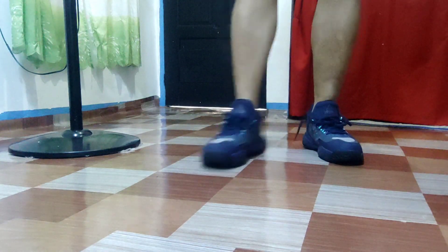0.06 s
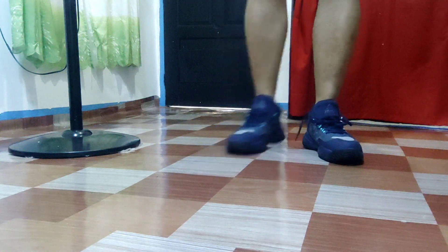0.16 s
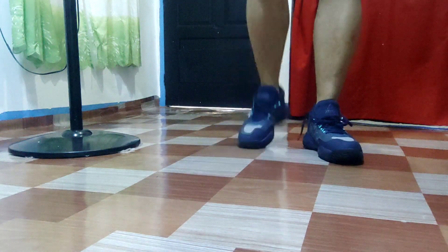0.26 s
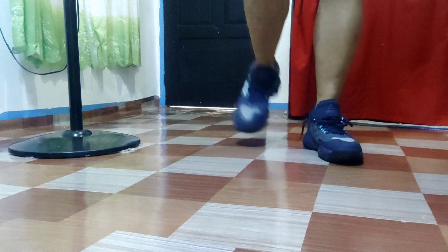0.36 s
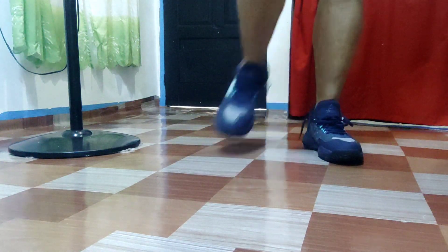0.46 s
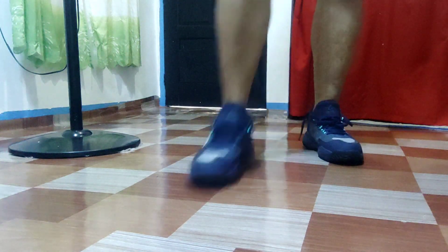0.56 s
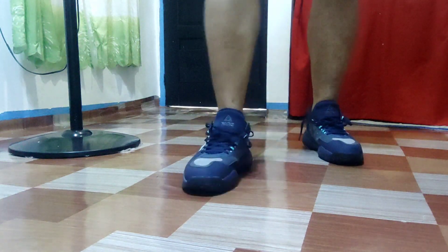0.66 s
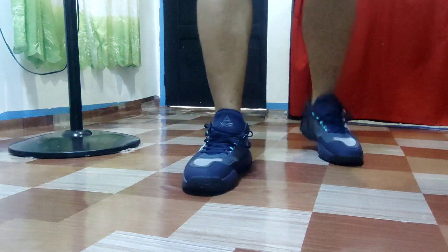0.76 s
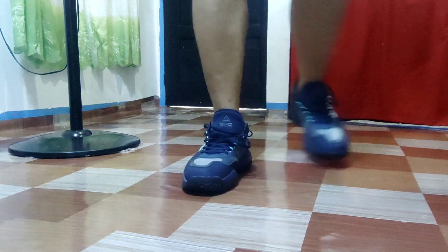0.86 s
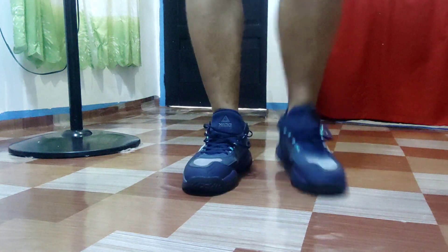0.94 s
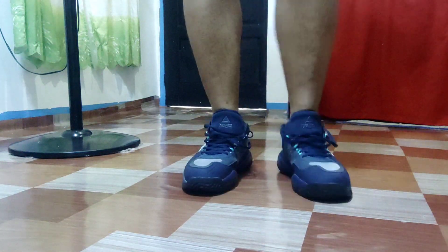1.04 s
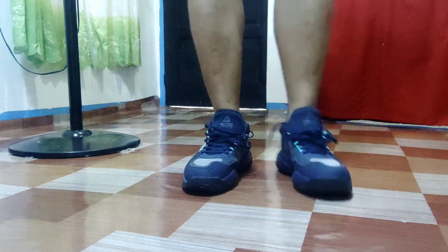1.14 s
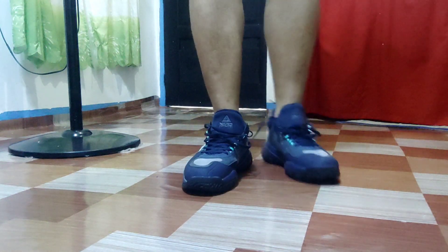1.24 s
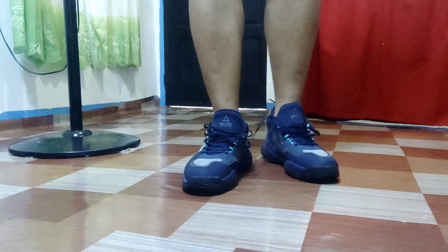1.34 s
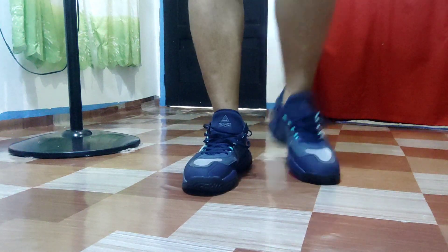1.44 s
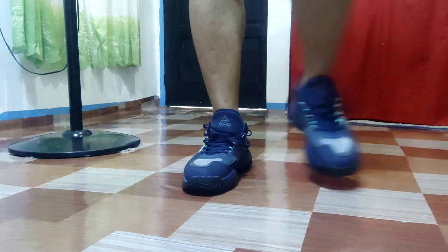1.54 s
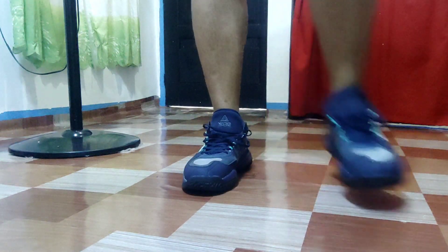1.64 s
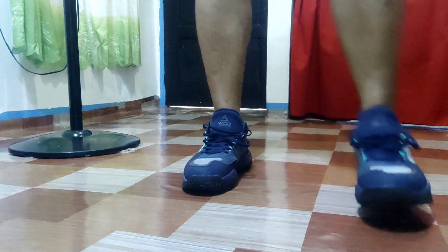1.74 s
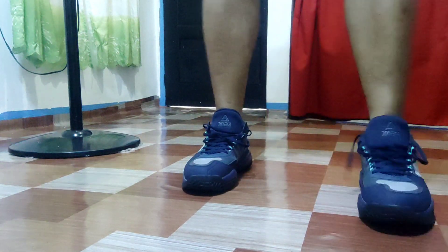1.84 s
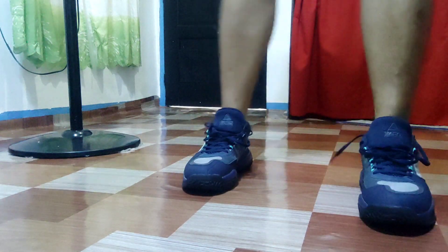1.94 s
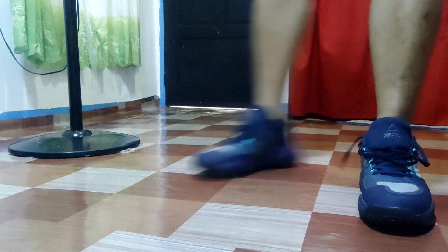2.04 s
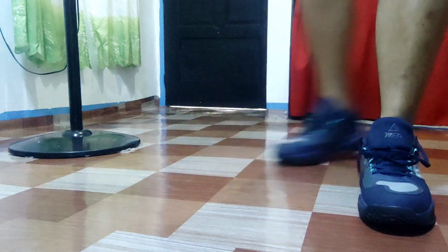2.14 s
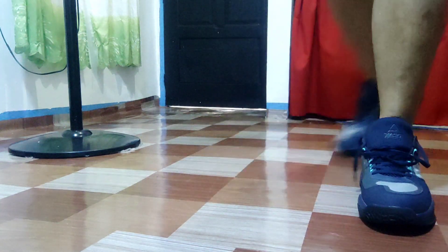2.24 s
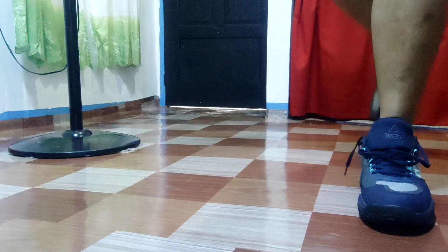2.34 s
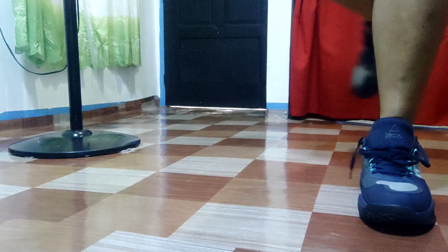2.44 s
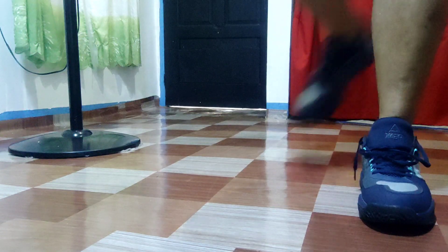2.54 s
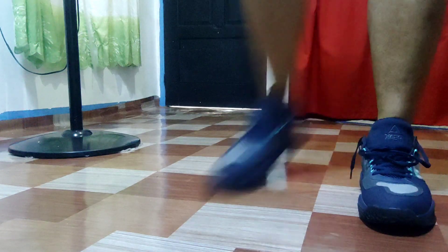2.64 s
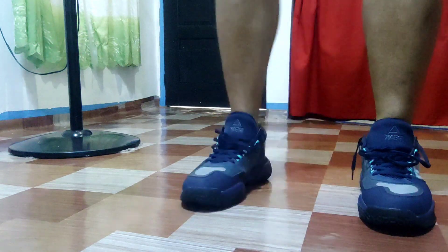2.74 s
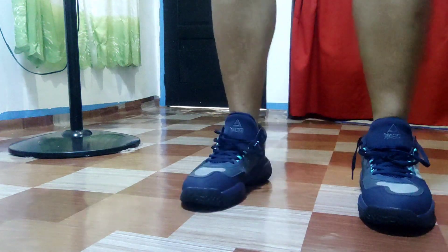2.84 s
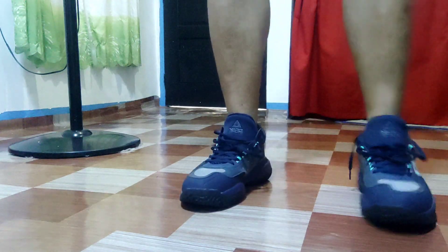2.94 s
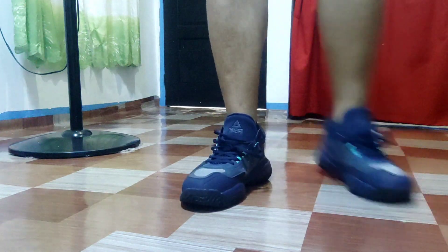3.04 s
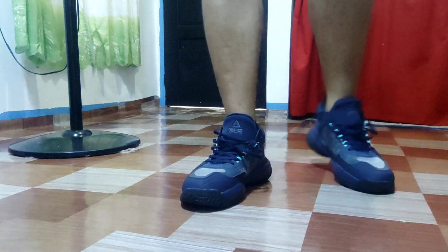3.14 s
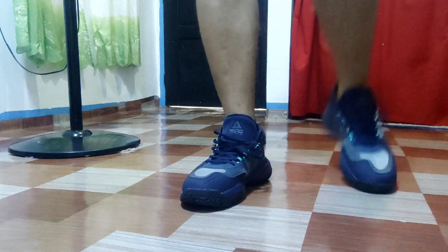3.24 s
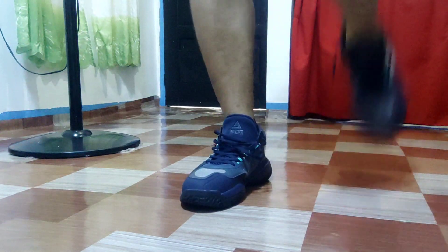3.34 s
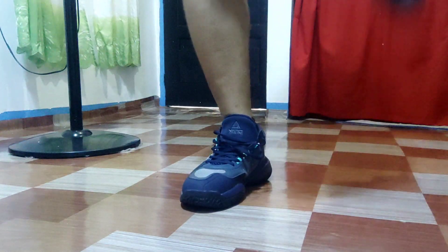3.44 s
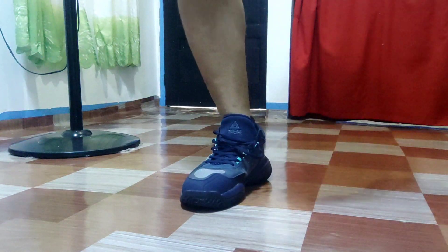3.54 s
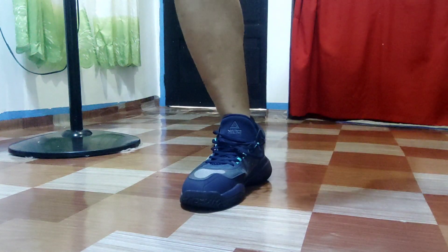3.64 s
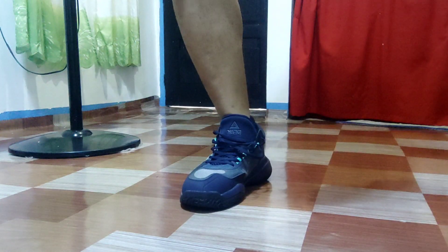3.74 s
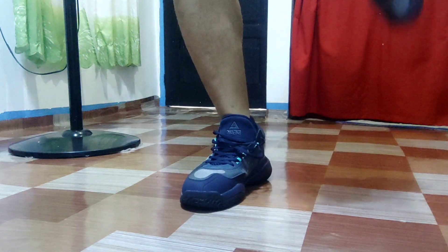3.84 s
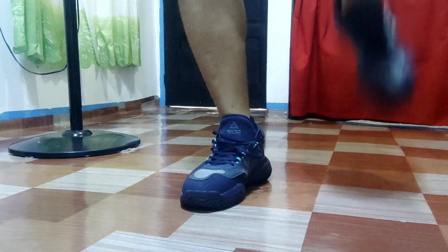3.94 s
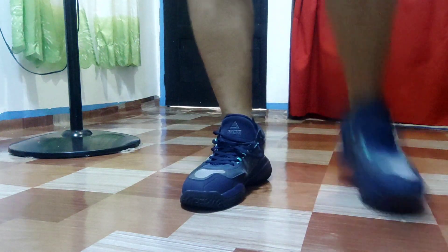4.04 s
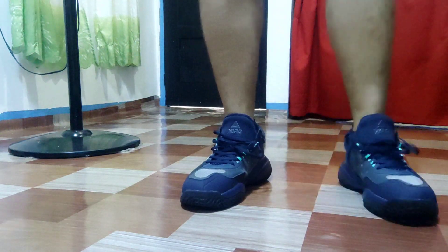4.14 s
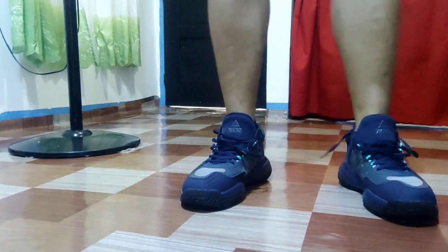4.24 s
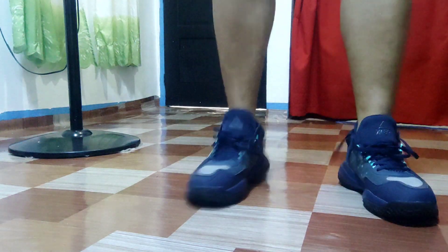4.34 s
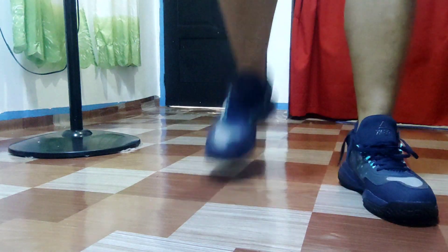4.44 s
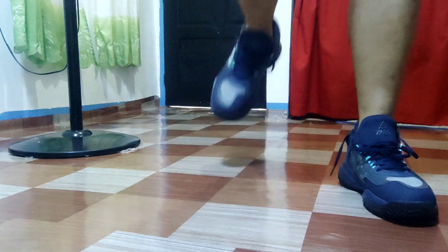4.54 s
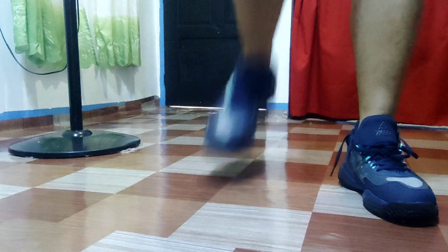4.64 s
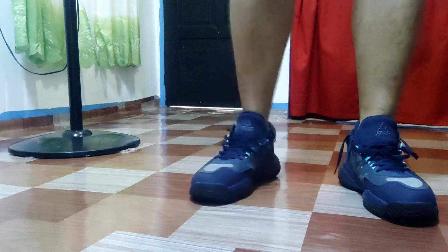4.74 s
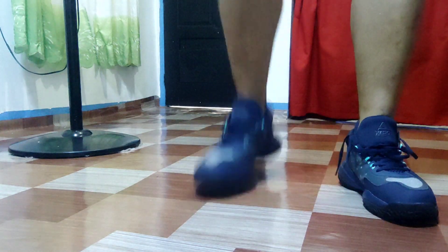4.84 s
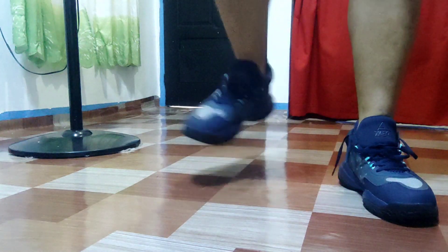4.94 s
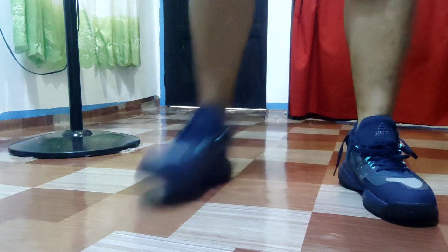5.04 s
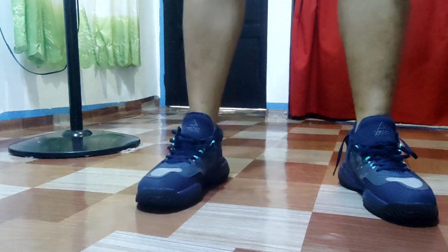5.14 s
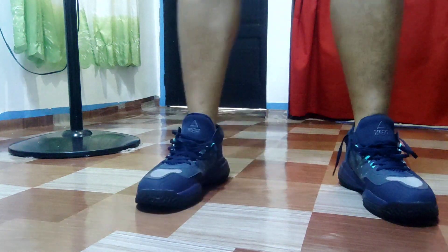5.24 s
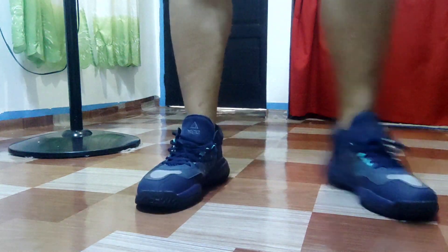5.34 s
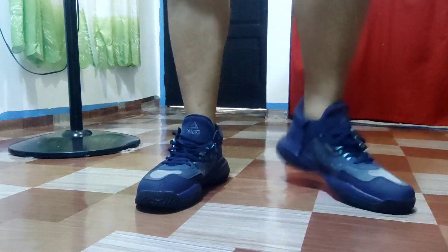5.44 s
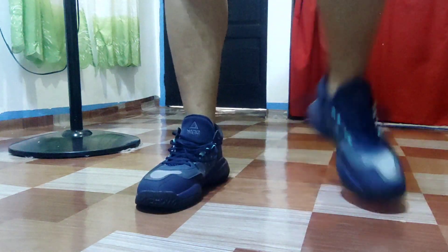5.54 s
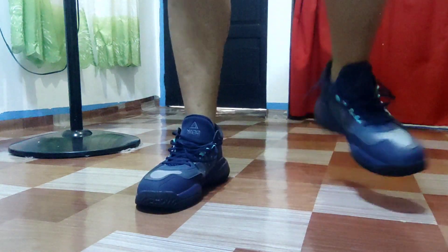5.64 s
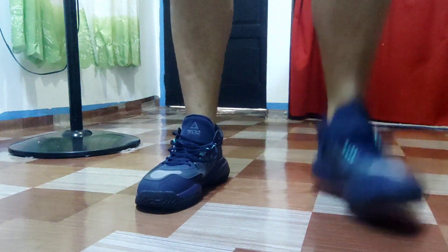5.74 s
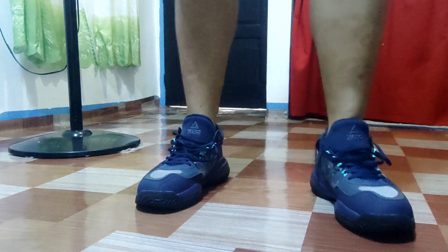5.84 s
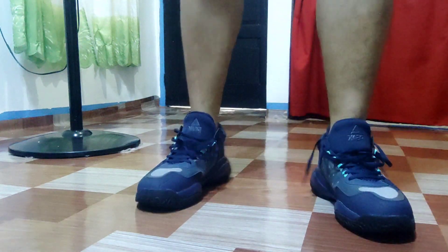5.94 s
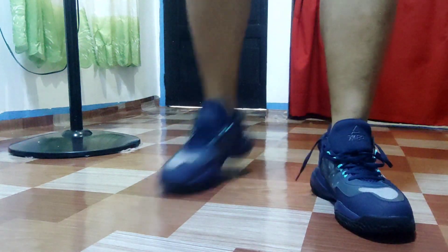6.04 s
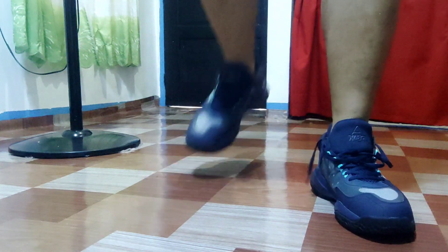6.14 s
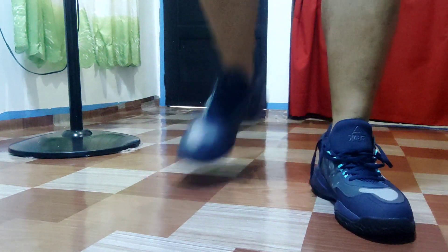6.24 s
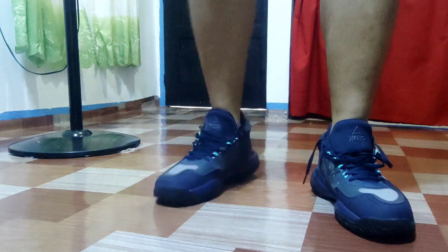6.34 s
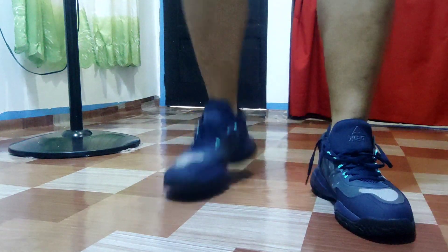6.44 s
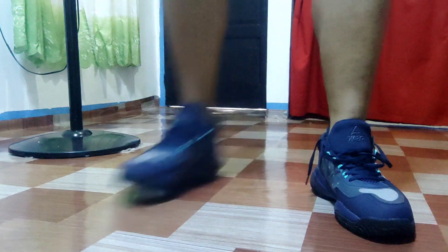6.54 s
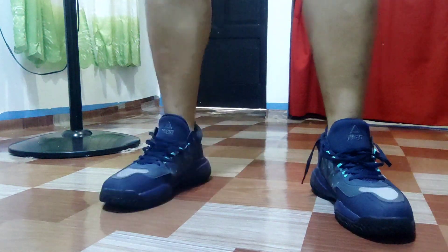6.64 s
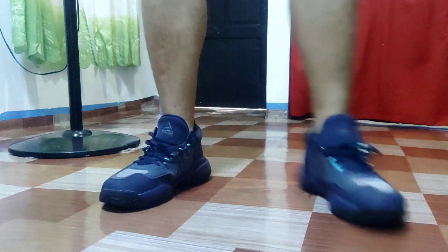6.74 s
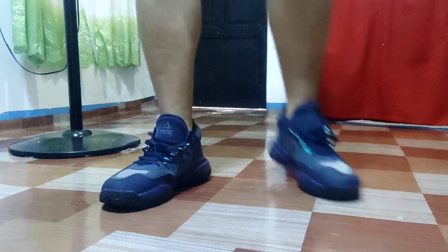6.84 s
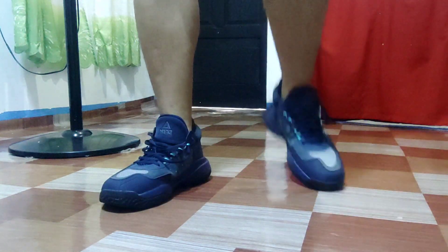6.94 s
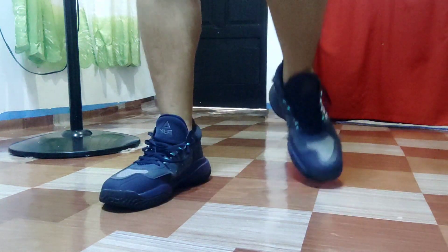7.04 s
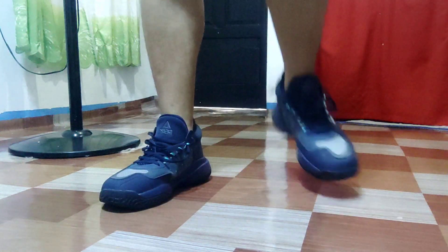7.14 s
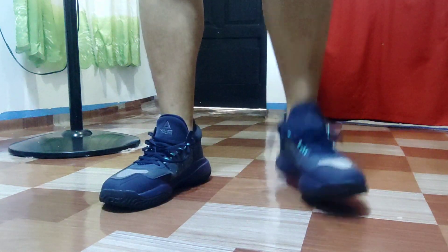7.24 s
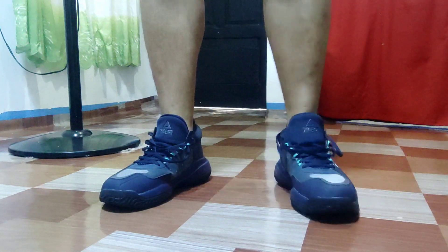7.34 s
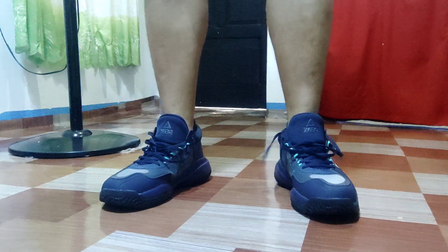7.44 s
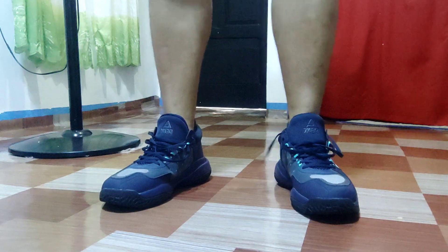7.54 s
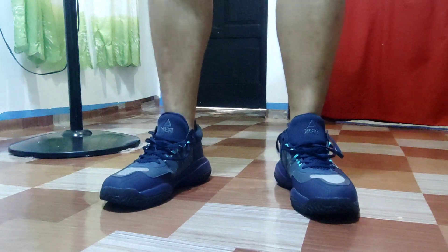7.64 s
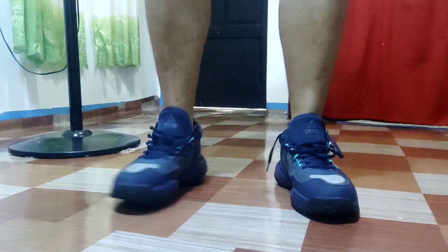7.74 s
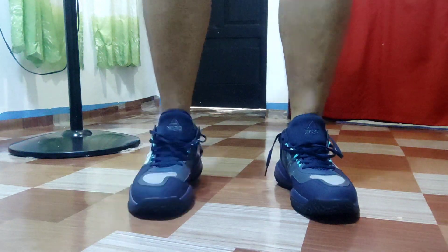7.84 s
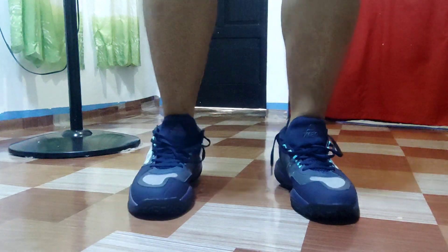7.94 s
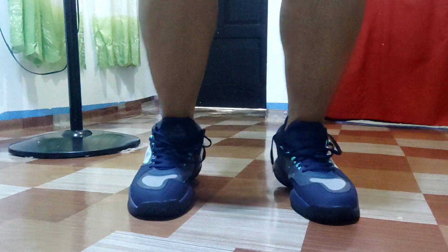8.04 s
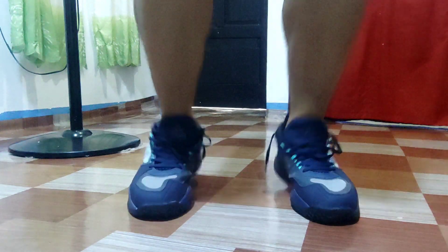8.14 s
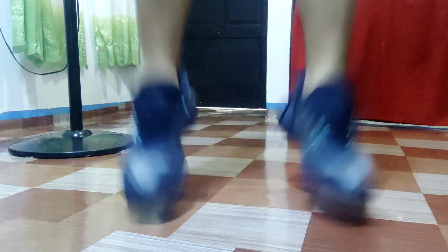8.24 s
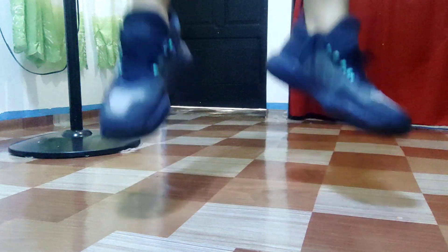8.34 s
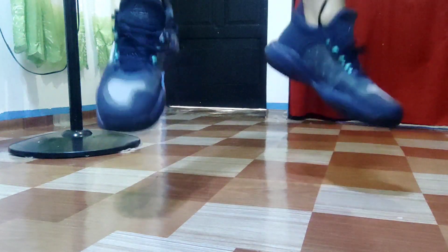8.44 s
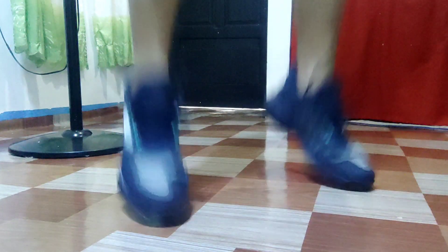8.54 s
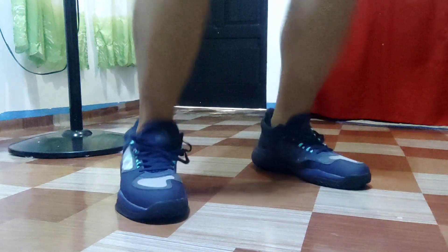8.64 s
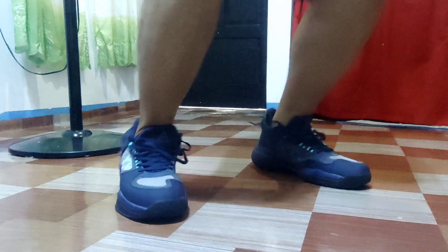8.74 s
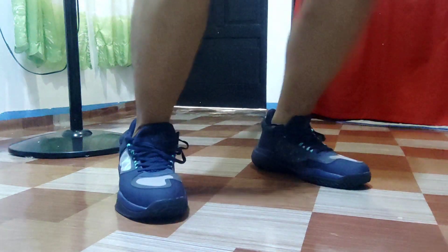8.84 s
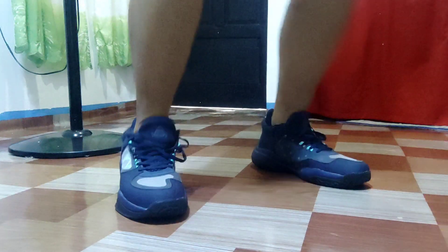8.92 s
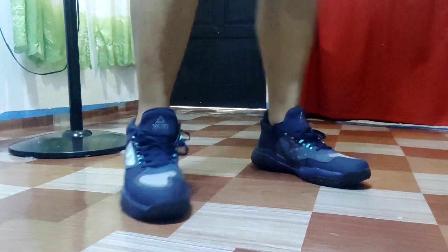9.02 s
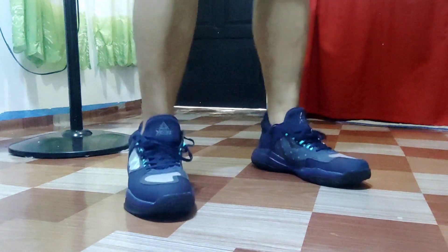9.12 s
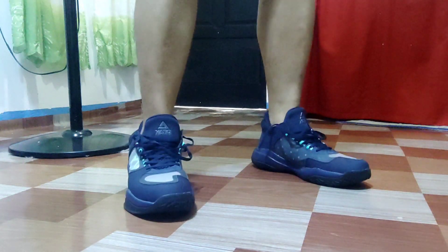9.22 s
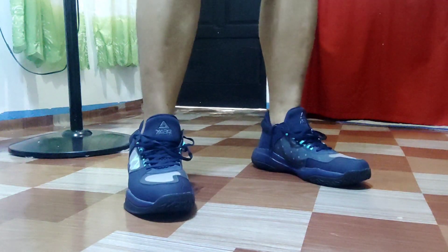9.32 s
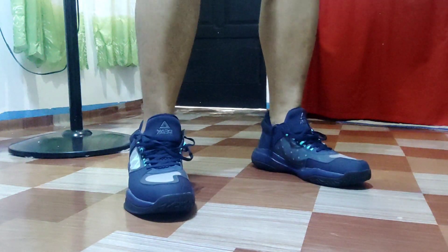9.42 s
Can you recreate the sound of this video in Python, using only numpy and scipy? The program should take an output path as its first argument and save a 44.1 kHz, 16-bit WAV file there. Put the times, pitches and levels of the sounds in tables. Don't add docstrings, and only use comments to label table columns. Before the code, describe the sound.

Sneakers work on smooth glazed tile: flat slaps, heel ticks, dull thuds and dry brushing drags, with clusters of very short high chirps, densest in the first two seconds. Pauses between steps expose soft fan air and a low hum. A distant bird crows faintly past the middle. Late on, squeaks stop and sparse snaps and a skid remain. Close phone pickup at floor level, lively small room.

```python
import sys
import numpy as np
from scipy import signal
from scipy.fft import rfft, irfft, next_fast_len
from scipy.io import wavfile
from scipy.ndimage import uniform_filter1d

SR = 44100
rng = np.random.default_rng(int(sys.argv[2]) if len(sys.argv) > 2 else 0)


def magnitude_from_level(level_db):
    exponent = np.asarray(level_db, float) / 20
    return 10 ** exponent


def digitize_waveform(pressure):
    field = np.atleast_2d(pressure).T
    bounded = np.clip(field, -1, 1)
    quanta = np.round(bounded * 32767).astype(np.int16)
    wavfile.write(sys.argv[1], SR, quanta)


N = 418068


def evened(x):
    return x / np.sqrt(np.mean(x ** 2) + 1e-20)


def read(points, hz):
    f, value = np.transpose(points)
    return np.interp(np.log(hz + 1), np.log(f + 1), value)


def add(mix, s, sound):
    part = mix[..., round(s * SR):][..., :sound.shape[-1]]
    part += sound[..., :part.shape[-1]]


def band(x, lo_hz, hi_hz):
    edges_hz = [lo_hz, min(hi_hz, SR / 2.2)]
    return signal.sosfilt(signal.butter(2, edges_hz, "band", fs=SR, output="sos"), x)


def unroll(length_s):
    return np.arange(0, max(length_s, .004), 1 / SR)


def wander(shape, span):
    smooth = uniform_filter1d(rng.standard_normal(shape), int(span))
    return evened(uniform_filter1d(smooth, int(span)))


# start_s, held_s, grip_db, bite_rate_hz, settled_rate_hz
SQUEAKS = [(.198, 0.0064, -23.5, 4000, 3806), (.209, 0.0038, -25, 3720, 3320),
           (0.668, 0.0039, -15.5, 3610, 3400), (0.683, 0.036, -28.5, 3390, 3343),
           (1.044, 0.019, -13, 3530, 3584), (1.069, 0.025, -16.5, 3956, 3803),
           (1.111, 0.13, -41, 3880, 3710), (1.334, 0.044, -19, 4084, 4066),
           (2.153, 0.041, -37.5, 3950, 3940), (2.166, 0.025, -21, 3610, 3460),
           (2.293, 0.037, -20.5, 3553, 3643), (3.174, .045, -25, 3795, 3888),
           (3.812, 0.0079, -51, 4410, 4280), (3.825, 0.054, -43, 4300, 4370),
           (4.177, 0.03, -36, 3620, 3540), (4.801, 0.0063, -23, 3770, 3780),
           (4.808, .014, -16.5, 3640, 3470), (6.394, 0.032, -22, 3490, 3386), (6.906, .02, -24, 4180, 3790),
           (6.926, 0.031, -20.5, 3767, 3680)]
# second_db, third_db, fourth_db
OVERTONES = [(-24, -33, -36), (-11, -31, -34), (-4, -8, -29), (0, -32, -16), (-3, -9.5, -16),
             (-3.5, -6.5, -17), (2, -11, -17), (-17.5, -26.5, -34), (-18, -12, -30), (0, -10.5, -14),
             (-9.5, -17.5, -20.5), (-12, -20, -27), (-17, -20, -30), (5.5, -18, -30), (-11, -27, -30),
             (-20, -18, -26), (-9.5, -18.5, -26), (-7.5, -13, -16), (-11, -15, -37), (-6.5, -11, -39)]
SPREAD = [.03, .035, .022, .009, .04, .012, .03, .017, .03, .005, .045, .022, .03, .018, .03, .05, .045,
          .045, .034, .03]


def squeak(row, overtones_db, spread, count=4):
    bite_s, let_go_s = .004, .018
    bite_db, sag_db, let_go_db_per_s = -5, -5, -1200
    locked_below = 0.016
    s, held_s, top_db, bite_hz, settled_hz = row
    t = unroll(bite_s + held_s + let_go_s)
    times = [0, bite_s, bite_s + held_s, t[-1]]
    grip_db = top_db + np.interp(t, times, [bite_db, 0, sag_db, sag_db + let_go_db_per_s * let_go_s])
    settle_s = 0.389 * (bite_s + held_s)
    hz = settled_hz + (bite_hz - settled_hz) * np.exp(-t / settle_s)
    loose = min(spread / locked_below, 1)

    shape = (count, len(t))
    offset = np.linspace(-1, 1, count)[:, None] + .5 * wander(shape, 180) + .4 * wander(shape, 12)
    turns = np.cumsum(hz * (1 + spread * offset), 1) / SR + loose * rng.random((count, 1))
    swell = magnitude_from_level(2.5 * wander(shape, 130))
    pulses = np.zeros(shape)
    for k, db in enumerate((0, *overtones_db)):
        pulses += magnitude_from_level(db) * np.cos(2 * np.pi * (k + 1) * turns)
    pulses += magnitude_from_level(-27) * evened(band(rng.standard_normal(shape), 1700, 8700))
    blocks = swell * pulses * magnitude_from_level(grip_db) / np.sqrt(count / 2)
    blocks *= signal.windows.tukey(len(t), 200 / len(t))

    lags = (loose * rng.integers(-9, 9, count)).astype(int)
    late = np.array([np.roll(b, lag) for b, lag in zip(blocks, lags)])
    return s, np.array([blocks.sum(0), late.sum(0)])


# start_s, slap_db, thud_db, tick_db, slap_centre_hz
HEELS = [
    (.655, -32, -34, -20.5, 1710),
    (1.029, -18.5, -33, -15.5, 910),
    (2.77, -30, -38, -20.5, 570),
    (4.175, -30, -19.5, -6.5, 520),
    (5.154, -34, -21, -14.5, 640),
    (6.664, -22.5, -27, -15.5, 890),
    (7.369, -26.5, -29.5, -18, 487),
]
# start_s, slap_db, thud_db, tick_db, slap_centre_hz
FLATS = [
    (.002, -11, -17, -9.5, 1423),
    (.667, -20.5, -41, -16, 914),
    (2.78, -23.5, -33, -42, 927),
    (2.799, -23.5, -24, -20, 835),
    (4.179, -16, -33, -10.5, 873),
    (4.801, -15.5, -22.5, -32, 680),
    (5.171, -16, -37, -17.5, 1670),
    (5.884, -10, -25, -47, 445),
    (6.384, -19, -27.5, -16, 652),
    (6.678, -18, -20.5, -12, 1524),
]
# start_s, slap_db, thud_db, tick_db, slap_centre_hz
TAPS = [(.179, -31.5, -37, -40, 759), (1.308, -47, -38, -32, 760), (3.049, -44, -59, -32, 921),
        (3.094, -30, -37.5, -33, 580), (3.638, -32, -42, -25, 930), (5.273, -28, -37, -46, 605),
        (5.407, -40, -43, -27.5, 727), (6.8, -36, -49, -29, 800), (6.842, -25.5, -33.5, -50, 675),
        (8.777, -27, -32.5, -37, 794), (9.206, -49, -30, -32, 563)]
# start_s, slap_db, thud_db, tick_db, slap_centre_hz
SNAPS = [
    (4.408, -32.5, -42, -23, 966),
    (4.796, -21, -38, -9, 643),
    (5.872, -15, -18, -7, 513),
    (5.885, -19.5, -30, -20, 1550),
    (6.082, -32, -58, -19.5, 1560),
    (7.391, -21.5, -52, -13.5, 1800),
    (7.396, -21.5, -22, -17, 497),
    (7.917, -28, -35.5, -18.5, 740),
    (8.67, -18.5, -33.5, -16, 1010),
    (8.682, -24, -41, -9.5, 600),
]
# mode_hz, level_db, t60_s
FLOOR_MODES = [(180.4, -2.5, 0.13), (258, -0.5, 0.085), (457, -2.5, 0.039)]


def steps(contacts, rattle_ms, click, ring_share):
    out, t = np.zeros((2, N)), np.arange(2200) / SR
    ring = np.zeros(len(t))
    for hz, db, t60 in FLOOR_MODES:
        ring += magnitude_from_level(db - 60 * t / t60) * np.sin(2 * np.pi * hz * t)
    push = band(-np.exp(-t / 0.0013) * np.sin(2 * np.pi * 260 * t) - 0.093 * ring, 99, 2800)
    lead = 90
    thud = np.roll(push, lead)
    fall = np.exp(-abs(t - lead / SR) * 1000 / np.where(t < lead / SR, .7, rattle_ms))
    for s, slap_db, thud_db, tick_db, slap_hz in contacts:
        rattle = rng.standard_normal((2, len(t))) * fall * magnitude_from_level(1.55 * wander(len(t), 26))
        rattle[:, lead] -= click
        slap = band(rattle.mean(0) + 0.42 * rattle, slap_hz / 2.39, slap_hz * 1.74)
        slap = slap * np.sqrt(1200 / slap_hz)
        slap += ring_share * band(rattle, slap_hz / 1.03, slap_hz * 1.03)
        tick = band(rattle, 3330, 27000) + .3 * band(rattle, 3170, 5000)
        hit = magnitude_from_level(thud_db + 7.5) * thud + magnitude_from_level(slap_db + 4.5) * slap + magnitude_from_level(tick_db - 10.0) * tick
        add(out, max(s - .5 * lead / SR, 0), hit)
    return out


# loudest_s, swell_s, fade_s, hiss_db, relative_rub_db
DRAGS = [(.212, .12, 0.22, -33.5, -0.5), (.322, 0.11, 0.074, -37, -17), (1.335, 0.088, .005, -30.5, -2),
         (2.079, 0.063, 0.021, -42.5, -6), (2.168, 0.11, 0.0052, -36.5, 2.5), (2.3, 0.22, 0.13, -30, -8.5),
         (3.055, .015, 0.21, -40.5, -4), (3.179, 0.1, .004, -34, -3), (3.645, 0.037, 0.083, -35, 6),
         (3.825, .12, 0.33, -28, -4), (3.994, 0.19, 0.065, -28, -5.5), (4.292, 0.022, 0.11, -37, 4.5),
         (5.275, 0.014, 0.12, -39, 9), (5.42, .08, 0.13, -38.5, 1.5), (6.904, 0.11, 0.0069, -36, -25),
         (7.758, 0.02, 0.036, -43.5, -7), (8.324, 0.17, 0.053, -37, 0), (9.028, 0.034, 0.12, -45.5, -12),
         (9.208, 0.055, 0.056, -39.5, 3.5)]
# loudest_s, fade_s, hiss_db, relative_rub_db
SKIDS = [(.008, 0.093, -35, 10), (2.779, 0.064, -23.5, -35), (4.197, .08, -34, -22),
         (5.2, 0.035, -47, 16.5), (5.887, 0.018, -33, 20.5), (6.684, 0.081, -45, 7),
         (6.841, 0.018, -36, -6), (7.37, .2, -53, 6), (7.395, 0.027, -30, 4), (7.916, 0.11, -43, 6),
         (8.776, 0.083, -29.5, -5)]


def scuff(top_s, swell_s, fade_s, top_db, rub_db):
    range_db = -21
    swell_s = np.clip(swell_s, .002, top_s)
    t = unroll(swell_s + fade_s)
    hiss_db = top_db + range_db * np.where(t < swell_s, 1 - t / swell_s, (t - swell_s) / fade_s)
    grains = rng.standard_normal((2, len(t))) * magnitude_from_level(1.9 * wander(len(t), 48))
    hiss = evened(band(grains, 2190, 13300))
    rub = evened(band(grains, 550, 3630))
    slide = magnitude_from_level(hiss_db - 8.5) * (hiss + magnitude_from_level(rub_db + 1.5) * rub)
    return top_s - swell_s, slide * signal.windows.tukey(len(t), .1)


# start_s, level_db, pitch_hz
LOADS = [
    (.68, -47, 96.3),
    (2.78, -35, 64.5),
    (3.27, -37, 73.3),
    (4.189, -40, 80.5),
    (4.8, -44, 69),
    (9.199, -42.5, 115.5),
]


def load(s, level_db, hz):
    rise_s, decay_s = 0.013, 0.37
    t = unroll(decay_s)
    turns = np.cumsum(hz * (1 + 0.12 * wander(len(t), 600))) / SR
    level = magnitude_from_level(level_db - 60 * t / (2 * decay_s)) * (1 - np.exp(-t / rise_s))
    return s, level * np.sin(2 * np.pi * turns) * signal.windows.tukey(len(t), .2)


# start_s, length_s, level_db, pitch_hz
CROW = [
    (.94, 0.082, -50, 819),
    (5.41, 0.13, -45, 882),
    (5.51, 0.12, -48, 863),
    (5.64, .06, -73, 860),
    (5.73, 0.1, -47.5, 854),
    (5.8, 0.089, -47.5, 849),
    (9.26, 0.083, -56, 853),
]


def crow(s, length_s, top_db, top_hz):
    t = unroll(length_s)
    level_db = top_db - 13 * (2 * t / length_s - 1) ** 4
    hz = top_hz * (1 - 0.018 * t / length_s)
    turns = np.cumsum(hz * (1 + .013 * wander(len(t), 200))) / SR
    level = magnitude_from_level(level_db + 2.3 * wander(len(t), 330))
    return s, level * np.sin(2 * np.pi * turns) * signal.windows.tukey(len(t), .2)


# frequency_hz, t60_s
ROOM = [(150, 0.26), (400, 0.42), (1040, 0.34), (2760, 0.48), (7280, 0.32)]
# frequency_hz, coherence_ratio
SAME = [(60, 0.43), (180, 0.91), (550, 0.54), (1650, -0.17), (4970, 0.16), (15000, -0.3)]


def room(x, count=3):
    out, size = np.zeros((2, N)), SR // 2
    same = np.clip(read(SAME, np.fft.rfftfreq(size, 1 / SR)), -1, 1)
    for k in range(count):
        taps = np.zeros((2, size))
        at = np.arange(120, size - 20, 20) + rng.integers(0, 20, (2, (size - 121) // 20))
        np.put_along_axis(taps, at, rng.choice([-1., 1.], at.shape), 1)
        left, other = rfft(taps)
        right = same * left + np.sqrt(1 - same ** 2) * other
        taps = irfft(np.array([left, right]), size)
        f, t, z = signal.stft(taps, SR, nperseg=256)
        tail = signal.istft(z * magnitude_from_level(-60 * t / read(ROOM, f)[:, None]), SR, nperseg=256)[1]
        tail = tail / np.linalg.norm(tail[0])
        turn = np.cos(np.pi * (np.arange(N) / SR * 3 + k / count)) * np.sqrt(2 / count)
        out += signal.oaconvolve((x[k % 2] * turn)[None], tail, axes=1)[:, :N]
    return out


# frequency_hz, density_db
FAN = [(6, -6), (25, -2), (48, -8), (72, -3.5), (110, -13), (290, -16.5), (545, -18), (770, -17),
       (1600, -18), (3400, -23), (5500, -31.5), (8000, -32), (11000, -32), (13500, -34.5)]
# frequency_hz, width_hz, level_db
HUM = [(71.6, 8.5, -47.5), (207.5, 9, -61), (282.4, 12.94, -61.5), (759, 25.56, -62.5)]


def fan():
    frames, hz = N // 512 + 5, np.fft.rfftfreq(2048, 1 / SR)
    a, b, c, d, patches = rng.standard_normal((frames, 1025, 5)).T
    patches = evened(uniform_filter1d(uniform_filter1d(patches, 16, 0), 8, 1))
    same = np.clip(read(SAME, hz), -1, 1)[:, None]
    left = a + 1j * b
    right = same * left + np.sqrt(1 - same ** 2) * (c + 1j * d)
    z = np.array([left, right]) * magnitude_from_level(read(FAN, hz)[:, None] + 1.2 * patches)
    air = magnitude_from_level(-47.5) * evened(signal.istft(z, nperseg=2048, noverlap=1536)[1][:, :N])
    for line_hz, width_hz, db in HUM:
        turns = np.cumsum(line_hz + width_hz / 2 * wander(N, 2290)) / SR
        air += magnitude_from_level(db + 1.64 * wander(N, 2800)) * np.sin(2 * np.pi * turns)
    return air


def scene():
    squeaks, slides, far = np.zeros((2, N)), np.zeros((2, N)), np.zeros((2, N))
    for row in zip(SQUEAKS, OVERTONES, SPREAD):
        add(squeaks, *squeak(*row))
    hits = steps(HEELS, rattle_ms=4.5, click=2, ring_share=.4)
    hits += steps(FLATS, rattle_ms=4.15, click=1.8, ring_share=1)
    hits += steps(TAPS, rattle_ms=4.2, click=.86, ring_share=.4)
    hits += steps(SNAPS, rattle_ms=1.24, click=4.4, ring_share=.4)
    for row in DRAGS:
        add(slides, *scuff(*row))
    for s, *row in SKIDS:
        add(slides, *scuff(s, .008, *row))
    for row in LOADS:
        add(hits, *load(*row))
    for row in CROW:
        add(far, *crow(*row))
    wet = room(magnitude_from_level(-4.5) * squeaks + magnitude_from_level(-2) * hits + magnitude_from_level(-4.5) * slides + magnitude_from_level(7.0) * far)
    return magnitude_from_level(2.5) * squeaks + hits + slides + magnitude_from_level(4.5) * far + wet + fan()


# frequency_hz, relative_db
GATE = [(900, -58), (2200, -43.5), (3000, -36), (4400, -31), (5400, -27.5), (6300, -41.5), (8000, -62),
        (9300, -49), (11000, -48), (12800, -46), (14000, -32)]
# frequency_hz, level_db
QUIET = [(2000, -100), (3000, -79), (4000, -78), (5000, -78), (6200, -83.5), (7500, -100)]


def spectral_gate(x, size=8):
    hz, t, z = signal.stft(x, SR, nperseg=1024)
    power = (abs(z[:, :512]) ** 2).mean(0).reshape(-1, size, len(t)).mean(1)
    level_db = 10 * np.log10(power + 1e-14)
    centre = hz[size // 2:512:size]
    gate_db = level_db[centre > 700].max(0) + read(GATE, centre)[:, None]
    bar_db = np.maximum(gate_db, read(QUIET, centre)[:, None])
    keep = np.clip(level_db - bar_db, .01, 1)
    keep[centre < 800] = 1
    z[:, :512] *= np.repeat(keep, size, 0)
    return signal.istft(z, SR, nperseg=1024)[1][:, :N]


def top_cut(x):
    return signal.sosfilt(signal.butter(12, 15610, fs=SR, output="sos"), x)


# resonance_hz, sharpness_q, level_db, bass_db
PORTS = [
    (11510, 5.6, 2, 2),
    (8785, 6.7, 2.5, -3),
]
# start_s, end_s, gain_db
DUCKS = [
    (1.04, 1.19, -8.5),
    (8.695, 8.789, -5),
]


def record(dry):
    size = next_fast_len(N + 2048)
    hz = np.fft.rfftfreq(size, 1 / SR)
    ports = []
    for f, q, db, bass_db in PORTS:
        cavity = 1 - (hz / f) ** 2 + 1j * hz / (f * q)
        ports.append(magnitude_from_level(db + bass_db / (1 + (hz / 110) ** 4)) / cavity)
    edge = np.clip(1 - (hz - 14170) / 150, magnitude_from_level(-27), 1)
    heard = irfft(rfft(dry, size) * np.array(ports) * edge, size)[:, :N]
    dip_db, t = np.zeros(N), np.arange(N) / SR
    for s, until, db in DUCKS:
        dip_db += db * ((t > s) & (t < until))
    heard = heard * magnitude_from_level(uniform_filter1d(dip_db, 900))
    limited = 0.92 * np.tanh(heard / 0.97)
    return top_cut(spectral_gate(limited))


dry = scene()
out = record(dry)
digitize_waveform(out)
```